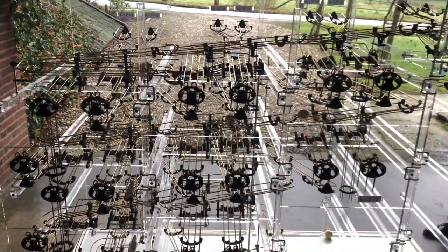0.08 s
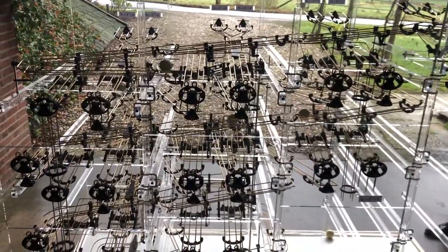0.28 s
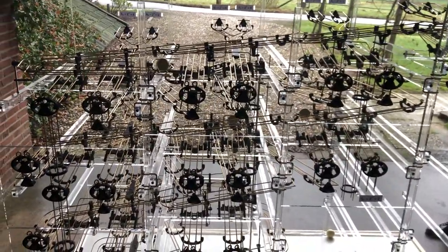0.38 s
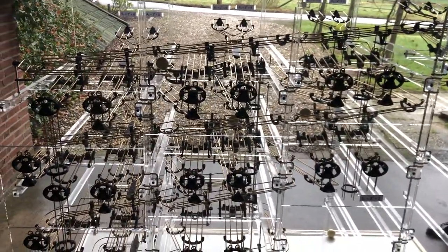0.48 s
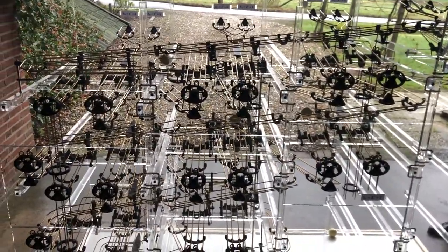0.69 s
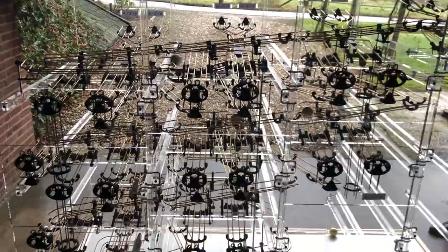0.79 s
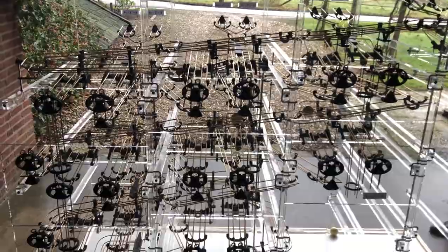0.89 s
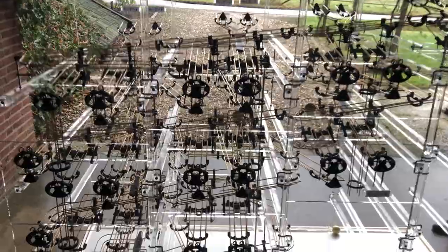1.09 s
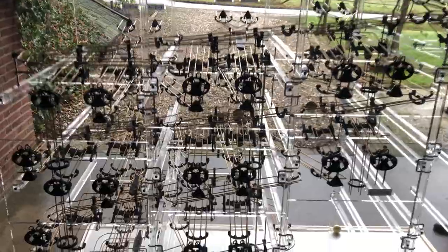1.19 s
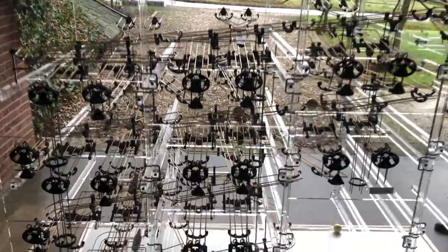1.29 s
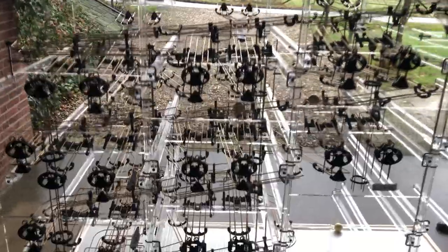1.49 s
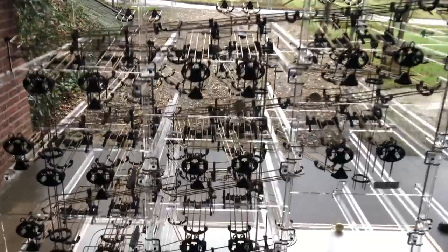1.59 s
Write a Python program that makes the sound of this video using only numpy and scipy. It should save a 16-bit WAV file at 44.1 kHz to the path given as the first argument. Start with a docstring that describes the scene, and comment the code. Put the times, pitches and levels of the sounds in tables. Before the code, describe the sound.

Heavy balls knock loudly on a marble machine's frame, three quick blows then three more, close to the microphone, echoing off hard walls; afterwards only small switch clacks, steel tinks and faint dull rolling.

```python
"""Ball machine between hard walls

Near the microphone, heavy balls thud on the frame: coloured noise bursts with a crack, over damped low board
modes, smeared so that the treble arrives first. Switches and balls clack (noise through one resonance) and small
steel parts tink (noise through high modes). Far balls roll faintly as patchy noise, a dull wash with a hiss.
The hard walls answer the blows with decaying noise tails."""
import sys
import numpy as np
from scipy import signal
from scipy.fft import rfft, irfft, next_fast_len
from scipy.io import wavfile
from scipy.ndimage import uniform_filter1d

SR = 44100
rng = np.random.default_rng(int(sys.argv[2]) if len(sys.argv) > 2 else 0)


def materialize(psi):
    """Save the field psi as 16-bit PCM at rate SR to the path in sys.argv[1].

    A 1-D psi becomes a single channel; in a 2-D psi each row is a channel.
    """
    bounded = np.clip(np.atleast_2d(psi).T, -1, 1)
    quanta = np.round(bounded * 32767).astype(np.int16)
    wavfile.write(sys.argv[1], SR, quanta)


def decibels_to_gain(level_db):
    """Convert a level in decibels to a linear amplitude gain (20 dB per decade)."""
    exponent = np.asarray(level_db, float) / 20
    return 10 ** exponent


N = 70560  # samples
SPAN = np.arange(SR) / SR  # s, the length allowed for one blow
LEAD = 256  # samples left free ahead of each blow, trimmed off in scene()

# Heavy blows on the frame: t/s, level/dB, brightness/dB per octave, walls/dB over the common share,
# board ring/dB over the common share, pitch of the nearest board f/Hz
THUD_BLOWS = [(0.059, -35.5, -1, 2.5, -3, 200), (0.11, -29.5, -8, 1.5, 0, 200.6),
              (0.185, -41.5, -3.5, 16.5, 7, 190), (0.223, -9.5, 1.5, 2.5, 5, 160.6),
              (0.267, -11, -0.66, 3, -1.5, 215), (0.299, -17.5, 0.7, -0.5, 0.5, 165),
              (0.442, -30.5, -7, -15, 2, 152), (0.57, -8, 0.7, -5, 1, 176.5),
              (0.596, -13, -1, 3.5, -5, 273), (0.691, -14, -1.5, 0.5, 3.5, 229),
              (1.249, -36, 1.5, 4.5, -1.5, 198), (1.551, -34.5, 0.2, 7, 1.5, 193),
              (1.579, -30.5, 1.5, 2.5, 0, 192)]
# Colour of the thud's rattle: f/Hz, level/dB
THUD_TONE = [(25, -62), (60, -17), (110, -10.5), (190, -12), (312, -5), (412, -6.5), (600, 0), (1180, -4.5),
             (1600, -8), (3400, -12), (6000, -22.5), (9700, -34), (16000, -53)]
# Colour of the crack: f/Hz, level/dB
CRACK_TONE = [(1000, -37), (2500, 9), (3600, 10), (5500, 1), (9000, -29), (16000, -28)]
# Modes of the frame boards: f/Hz, level/dB, t60/s
BOARD_MODES = [(143, -2.5, 0.627), (161.3, -3, 0.67), (178.6, -3, 0.73), (200.75, 0.5, 0.83),
               (257.8, 3.5, 0.49), (277.7, -1, 0.91), (310, -3, 1), (558.3, 0, 0.13), (646, -11, 0.17),
               (804, -11.5, 0.14), (1032.5, -10, 0.44), (1274, -11.5, 0.24)]


def thuds(out_size):
    """Each blow cracks, rattles and rings the frame; bending waves bring the treble first."""
    thud_t60, crack_t60 = 0.051, 0.026  # s
    walls_db, ring_share_db = 0.5, -15
    crack_db = np.array([[-7], [5]])  # the second signal, which makes the stereo spread, is 12 dB stronger
    reach_db = 12  # loss of a low mode one octave from the nearest board
    bend = 0.16  # bending waves arrive bend / sqrt(Hz) s late
    out = np.zeros((2, out_size))
    for s, db, tilt_db, wet_db, ring_db, board_hz in THUD_BLOWS:
        tilt = lambda hz: decibels_to_gain(tilt_db * np.log2(hz / 1000 + .01))
        dry = rattle(lambda hz: decibels_to_gain(along(THUD_TONE, hz)) * tilt(hz), thud_t60, rise_s=0.0026)
        crack = rattle(lambda hz: decibels_to_gain(along(CRACK_TONE, hz)), crack_t60, rise_s=0.0049)
        crack = decibels_to_gain(crack_db) * tilt(6000) * crack
        lean_db = lambda hz: -reach_db * np.log2(hz / board_hz) ** 2 * (hz < 400)
        boards = ring(BOARD_MODES, lean_db, scatter_db=3.0)
        sound = walls(dry, walls_db + wet_db) + crack + decibels_to_gain(ring_share_db + ring_db) * boards
        bent = filtered(sound, lambda hz: np.exp(-4j * np.pi * bend * np.sqrt(hz)))
        add(out, s - .008, decibels_to_gain(db) * bent)  # starts early, as bending delays 400 Hz by 8 ms
    return out


# Switches and ball-on-ball clacks: t/s, level/dB, centre f/Hz, half-width f/Hz
CLACK_BLOWS = [(0.019, -35.5, 3350, 1180), (0.068, -35.5, 3080, 1500), (0.116, -35.5, 4500, 2000),
               (0.684, -26.5, 3800, 1480), (0.709, -39, 6500, 2492), (0.882, -31, 5300, 3070),
               (0.915, -35, 4300, 2511), (1.002, -34.5, 5080, 2600), (1.016, -34.5, 3390, 1990),
               (1.140, -39.5, 4400, 1993), (1.247, -36, 3500, 700), (1.2635, -44, 3570, 800),
               (1.3041, -40.5, 3450, 2030), (1.4436, -37.5, 3796, 800), (1.453, -40, 2740, 600),
               (1.481, -43, 2960, 805), (1.506, -63, 3030, 700), (1.5534, -25.5, 3700, 1180)]


def clacks(out_size):
    """A short rattle through one resonance of the struck part."""
    skirt_db, low_hz = -44.5, 600  # floor under the resonance, low cut
    out = np.zeros((2, out_size))
    for s, db, centre_hz, width_hz in CLACK_BLOWS:
        resonance = lambda hz: 1 / (1 + ((hz - centre_hz) / width_hz) ** 2) + decibels_to_gain(skirt_db)
        body = lambda hz: resonance(hz) * hz ** 2 / (hz ** 2 + low_hz ** 2)
        clack = rattle(body, t60=0.02, rise_s=0.00048)
        add(out, s - .001, decibels_to_gain(db) * walls(clack, wet_db=3))
    return out


# Small steel parts: t/s, level/dB, brightness/dB per octave, rattle t60/s
TINK_BLOWS = [(0.0135, -41.5, 0, 0.081), (0.072, -42.5, 4, 0.15), (0.1126, -35, -3.5, 0.15),
              (0.1485, -39, 0, 0.1), (0.4413, -51, -8, 0.27), (0.659, -38.5, -3, 0.12),
              (0.7083, -27, -4.5, 0.081), (0.749, -40, -5, 0.1), (0.7974, -42, -5, 0.068),
              (0.8812, -34, 1.5, 0.1), (0.9514, -29.5, 14, 0.2), (1.034, -38.5, -2, 0.097),
              (1.0969, -36, -3, 0.077), (1.1394, -43.5, 3, 0.065), (1.1992, -45.5, -6.5, 0.085),
              (1.2994, -45, -1, 0.14), (1.3793, -44, 10, 0.069), (1.5504, -33.5, -7.5, 0.079),
              (1.5733, -26, 6, 0.12)]
# High modes of the steel: f/Hz, half-width f/Hz, level/dB before scatter
STEEL_MODES = [(4900, 230, -1.5), (6400, 290, -2), (7380, 280, -7.5), (8450, 220, -1), (10030, 260, -7),
               (9840, 280, -4.5), (11720, 260, -1.5), (12500, 190, -6.5), (12860, 180, -3.5),
               (14100, 160, -8), (14500, 200, -8)]
# Colour of the tinks: f/Hz, level/dB
TINK_TONE = [(3000, -22.5), (6000, -7.5), (9000, -3), (13000, -3.5), (15000, -6.5), (16000, 7)]


def tinks(out_size):
    """A bright rattle through the fuzzy high modes of small steel parts."""
    skirt_db, scatter_db = -1.5, 7  # floor under the modes, spread of their levels from tink to tink
    out = np.zeros((2, out_size))
    centre, width, level_db = np.transpose(STEEL_MODES)[:, :, None]
    for s, db, tilt_db, t60 in TINK_BLOWS:
        gain = decibels_to_gain(level_db + scatter_db * rng.standard_normal(level_db.shape))
        modes = lambda hz: np.sum(gain / (1 + ((hz - centre) / width) ** 2), 0) + decibels_to_gain(skirt_db)
        lean_db = lambda hz: tilt_db * np.log2(hz / 10000 + .01)
        colour = lambda hz: decibels_to_gain(along(TINK_TONE, hz) + lean_db(hz)) * modes(hz)
        tick = rattle(colour, t60, rise_s=0.0039)
        add(out, s - .001, decibels_to_gain(db) * walls(tick, wet_db=-5.5))
    return out


# Level of the dull rolling wash: t/s, level/dB
ROLL_LEVEL = [(0.0, -42), (0.132, -38), (0.346, -40.5), (0.738, -40.5), (1.05, -42), (1.6, -50)]
# Colour of the wash: f/Hz, level/dB
ROLL_TONE = [(15, -38), (30, -13), (90, 0.5), (190, 1), (439, -7), (1000, -10), (2480, -15), (6000, -28.5),
             (12500, -57), (16000, -58)]
# Level of the treble hiss of many loose parts: t/s, level/dB
HISS_LEVEL = [(0.0, -51), (0.254, -52.5), (0.404, -60), (0.646, -77), (0.792, -56.5), (0.908, -54),
              (1.166, -52), (1.344, -70), (1.6, -64)]
# Colour of the hiss: f/Hz, level/dB
HISS_TONE = [(2000, -9), (4000, -7), (7000, 2), (11000, -3), (16000, -7.5)]


def rolling():
    """Far balls on the rails: a dull wash, and the hiss of loose parts shaken by them."""
    return wash(ROLL_LEVEL, ROLL_TONE, patchy_db=2.0) + wash(HISS_LEVEL, HISS_TONE, patchy_db=5)


def wash(levels, colour, patchy_db):
    """Noise on a level curve, its strength patchy over time and frequency."""
    z = signal.stft(rng.standard_normal((2, N)), nperseg=512)[2]
    field = uniform_filter1d(rng.standard_normal(z.shape[1:]), 6, 0)  # smooth in frequency
    field = uniform_filter1d(field, 8, 1)  # smooth in time
    noise = signal.istft(z * decibels_to_gain(patchy_db * unit(field)), nperseg=512)[1][:, :N]
    s, db = np.transpose(levels)
    coloured = unit(filtered(noise, lambda hz: decibels_to_gain(along(colour, hz))))
    return decibels_to_gain(np.interp(np.arange(N) / SR, s, db)) * coloured


# Decay of the hard walls: f/Hz, t60/s
WALL_DECAY = [(60, 0.78), (200, .8), (700, 0.51), (2000, 0.63), (5000, 0.51), (12000, 0.37)]


def walls(x, wet_db):
    """x and a fresh noise tail whose frequencies die at their own speeds."""
    hz, t, z = signal.stft(rng.standard_normal((2, SR)), SR, nperseg=256)
    decay = decibels_to_gain(-60 * t / along(WALL_DECAY, hz)[:, None])
    tail = signal.istft(z * decay, SR, nperseg=256)[1][:, :SR]
    answer = signal.fftconvolve(x, tail / np.linalg.norm(tail[0]), axes=1)[:, :SR]
    return x + decibels_to_gain(wet_db) * answer


# Likeness of left and right: f/Hz, left-right likeness (1 = the same)
LIKENESS = [(3000, 1), (4500, 1), (7000, 1), (10000, 0.97), (14000, 0.81)]


def pair(two):
    """Left and right from two signals, mixed as middle and side: the same up to the treble."""
    turn = lambda hz: np.arccos(np.clip(along(LIKENESS, hz), 0, 1)) / 2
    mid, side = filtered(two, lambda hz: np.array([np.cos(turn(hz)), np.sin(turn(hz))]))
    return np.array([mid + side, mid - side])


def rattle(response, t60, rise_s):
    """A coloured, decaying burst of contact noise, near rms 1 at its onset."""
    burst = rng.standard_normal((2, SR)) * decibels_to_gain(-60 * SPAN / t60) * (1 - np.exp(-SPAN / rise_s))
    x = filtered(np.pad(burst, ((0, 0), (LEAD, 0)))[:, :SR], response)
    return unit(x) * np.sqrt(t60 / 14)  # a decay's mean power over 1 s is about t60 / 14


def ring(modes, lean_db, scatter_db):
    """Damped modes, each at a fresh level and phase."""
    hz, db, t60 = np.transpose(modes)[:, :, None]
    draw = rng.standard_normal((2, len(hz), 1))
    level = decibels_to_gain(db + lean_db(hz) + scatter_db * draw[0] - 60 * SPAN / t60)
    tone = np.sum(level * np.sin(2 * np.pi * hz * SPAN + 10 * draw[1]), 0)
    return np.roll(tone * (1 - np.exp(-SPAN / .002)), LEAD)


def unit(x):
    """Scaled to rms 1."""
    return x / np.sqrt(np.mean(x ** 2) + 1e-20)


def along(points, hz):
    """Values of (Hz, value) points, read along a log frequency axis."""
    f, v = np.transpose(points)
    return np.interp(np.log(hz + 1), np.log(f + 1), v)


def filtered(x, response):
    """x filtered by a complex response of frequency."""
    n = x.shape[-1]
    m = next_fast_len(n + 8192)
    return irfft(rfft(x, m) * response(np.fft.rfftfreq(m, 1 / SR)), m)[..., :n]


def add(out, s, x):
    """Mix x in at time s."""
    start = round(s * SR)
    out[:, start:start + SR] += x


def scene():
    """All sources, spread slightly in the treble."""
    size = N + SR
    hits = thuds(size) + clacks(size) + tinks(size)
    return pair(hits[:, LEAD:LEAD + N] + rolling())


def band_limit(x):
    """A steep low-pass at the top of the band."""
    return signal.sosfilt(signal.butter(12, 16480, fs=SR, output="sos"), x)


def record(dry):
    """The input stage behind the microphones: a soft ceiling, then a band limit."""
    ceiling, knee = 0.76, 7  # full scale = 1; a higher knee bends more sharply
    top_hz, edge_hz = 15800, 60
    held = dry / (1 + np.abs(dry / ceiling) ** knee) ** (1 / knee)
    mix = filtered(held, lambda hz: .5 - .5 * np.tanh((hz - top_hz) / edge_hz))
    return band_limit(mix)


dry = scene()
out = record(dry)
materialize(out)
```